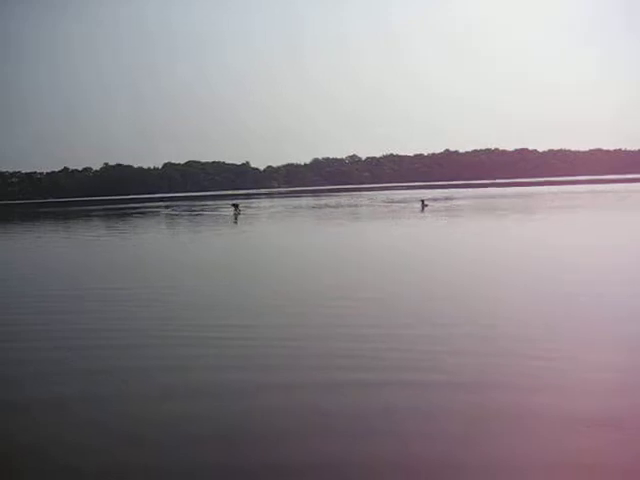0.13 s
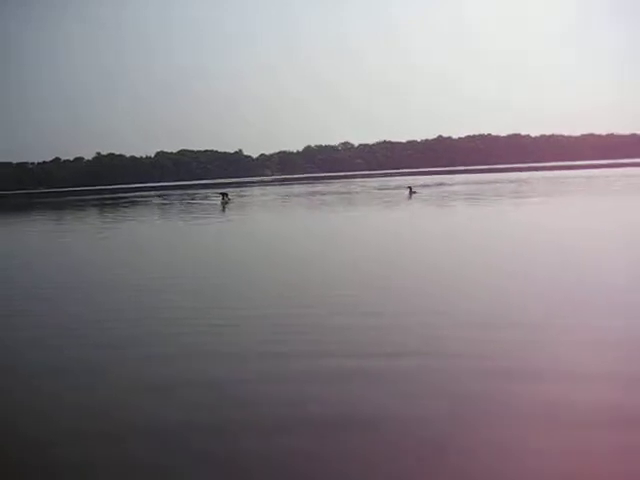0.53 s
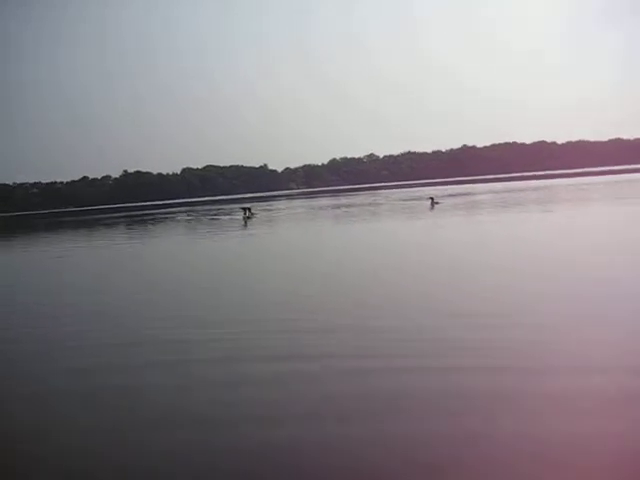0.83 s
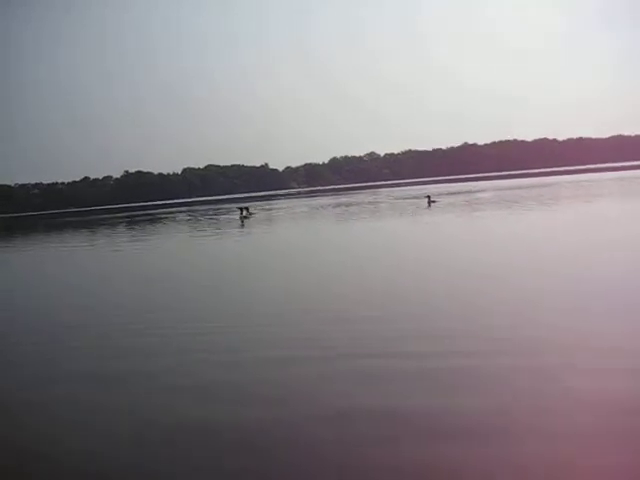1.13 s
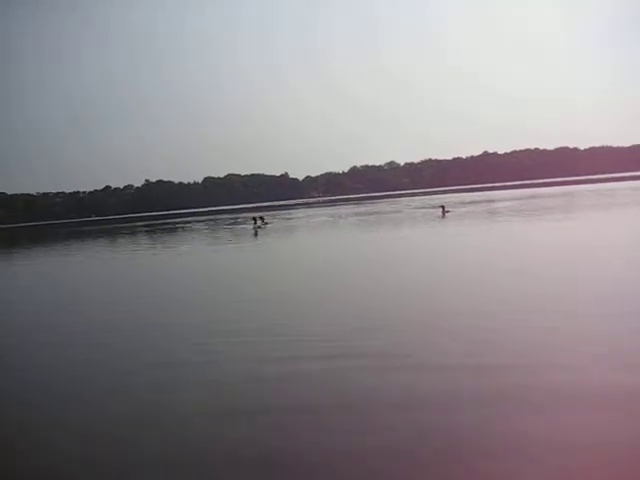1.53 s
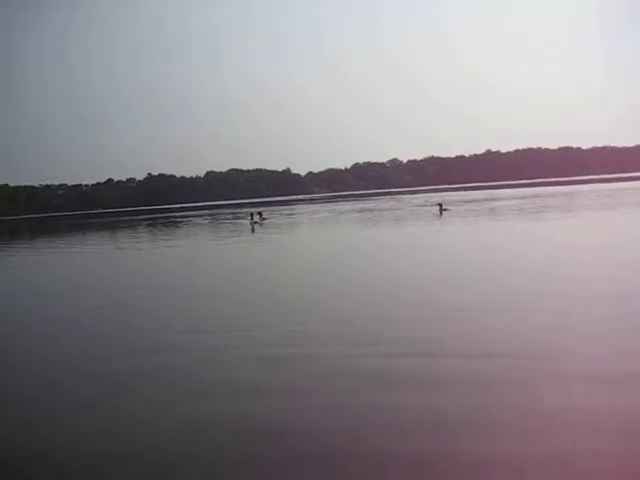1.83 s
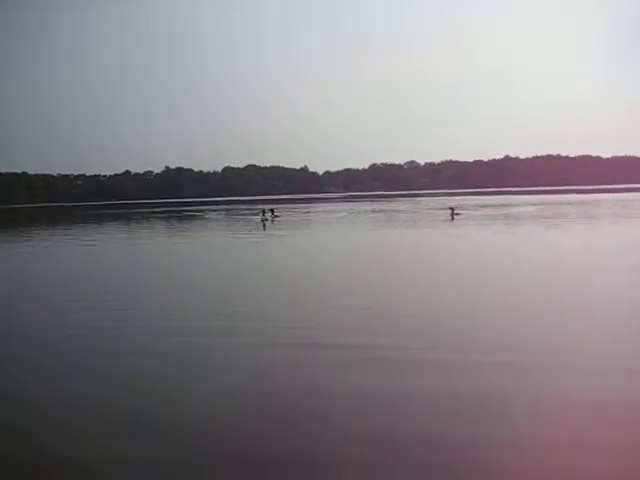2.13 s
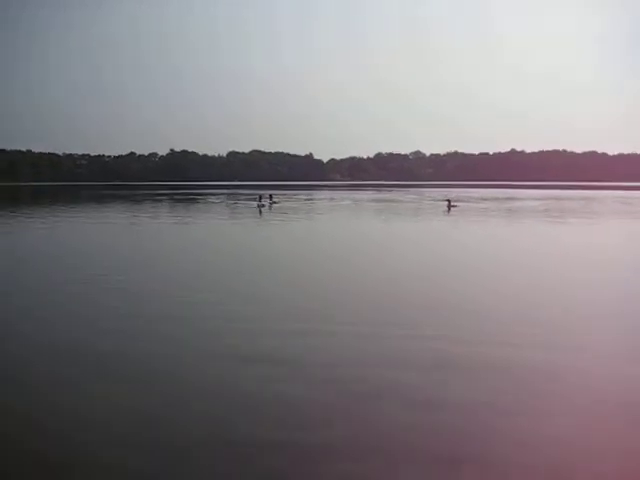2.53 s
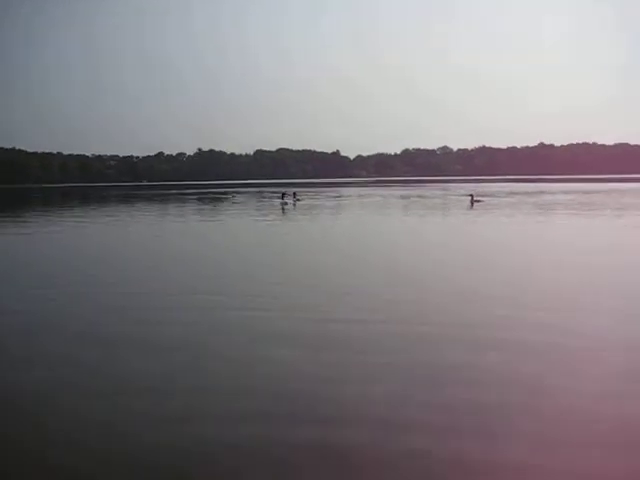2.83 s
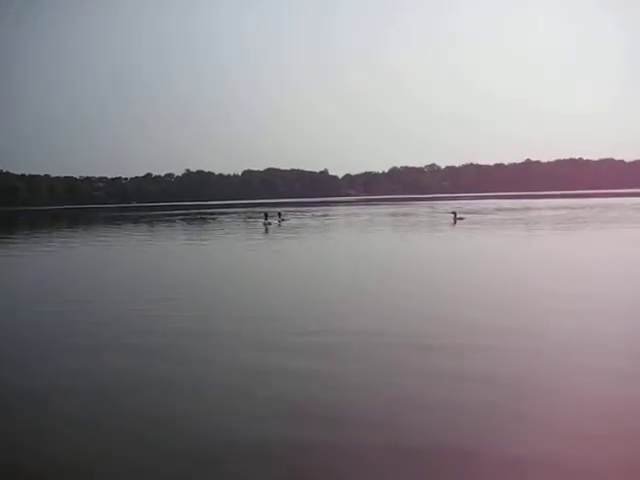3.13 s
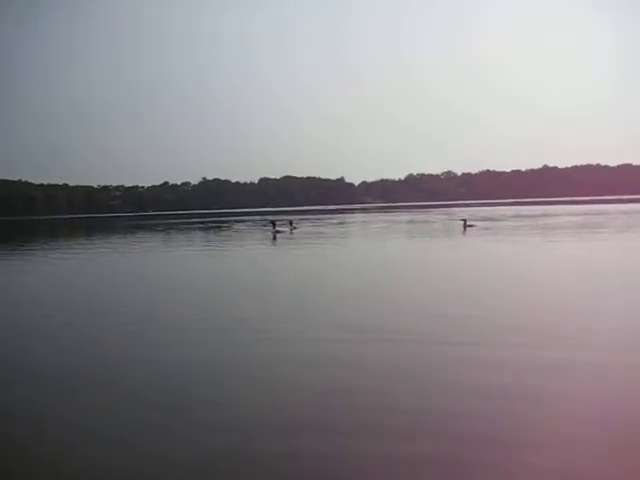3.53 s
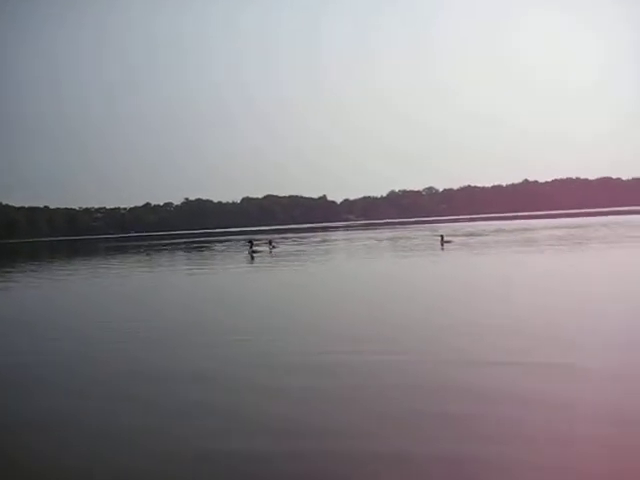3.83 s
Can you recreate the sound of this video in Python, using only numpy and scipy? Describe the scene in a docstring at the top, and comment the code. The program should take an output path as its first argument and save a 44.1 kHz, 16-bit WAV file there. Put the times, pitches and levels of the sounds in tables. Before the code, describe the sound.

Quavering loon calls ring across open water, flipping between low reedy notes and a clear high tremolo, with a very faint echo. The slightly dull microphone picks up gusty wind rumble, constant hiss and some light knocks.

```python
"""Loons on a calm lake.

Each call starts in a low reedy voice, breaks upward into a near-pure tremolo of ten swings a second
and drops back; the far shore returns a faint echo. Wind buffets the microphone over a steady hiss
and a few small knocks. A small camera limits the peaks and samples at a low rate."""
import sys
import numpy as np
from scipy import signal
from scipy.io import wavfile

SR = 44100
rng = np.random.default_rng(int(sys.argv[2]) if len(sys.argv) > 2 else 0)


def inscribe(sig):
    """Save sig as 16-bit PCM at rate SR to the path in sys.argv[1].

    A 1-D sig is mono; a 2-D sig holds one channel per row.
    Samples are clipped to [-1, 1] before scaling.
    """
    pcm = np.round(np.clip(np.atleast_2d(sig).T, -1, 1) * 32767)
    wavfile.write(sys.argv[1], SR, pcm.astype(np.int16))


N = 176400
TIME = np.arange(N) / SR

# Hiss spectrum: freq_hz, relative_density_db
HISS_SPECTRUM = [(100, -2.5), (500, -4), (1100, 4.5), (2000, -1), (3500, 0.5), (5000, -1), (7000, -12.5),
                 (12000, -51.5)]
# Wind rumble spectrum: freq_hz, relative_density_db
WIND_SPECTRUM = [(12, 0), (35, 2), (65, 1.5), (120, -1.5), (200, -19), (300, -21), (450, -38.5),
                 (700, -46.5), (1200, -60.5)]
# Wind rumble envelope: time_s, level_db
WIND_ENVELOPE = [(0, -24.5), (.4, -31), (.65, -30.5), (.77, -37), (.87, -29), (1.05, -29.5), (1.3, -25),
                 (1.5, -27), (1.75, -30), (2.0, -28), (2.23, -36), (2.33, -28.5), (2.5, -40.5), (2.75, -26),
                 (3.03, -34), (3.3, -35.5), (3.6, -34.5), (4.0, -35)]
# Slaps of air on the microphone: start_s, level_db, nominal_hz
BUFFETS = [(.390, -22.5, 134), (.442, -17, 181), (.538, -25, 243), (0.549, -21, 89.5), (.596, -14.5, 119),
           (.678, -26, 168), (0.819, -26, 180), (.843, -38.5, 91), (0.955, -24, 129), (1.115, -25, 130),
           (1.155, -26, 180), (1.195, -23, 159), (1.235, -19, 91.3), (1.341, -15, 145), (1.371, -15.5, 140),
           (1.571, -17.5, 204), (1.888, -18.5, 149.2), (1.969, -14.5, 121), (2.02, -20, 104),
           (2.114, -21, 218), (2.142, -20.5, 133), (2.306, -13, 67.8), (2.433, -22.5, 64.8),
           (2.649, -24.5, 148), (2.742, -22.5, 200), (2.871, -21, 130), (2.933, -27, 120), (2.97, -20, 80),
           (3.097, -19, 101), (3.636, -26.5, 136), (3.795, -25, 168), (3.934, -20, 65)]
# Knocks near the microphone: start_s, level_db, ring_hz, relative_snap_db
KNOCKS = [(0.275, -19, 1160, -18.5), (.443, -27.5, 950, -38), (0.705, -38, 1260, -22),
          (.944, -31.5, 990, 2.5), (1.13, -29.5, 1410, -6.5), (1.179, -30.5, 1200, -11),
          (1.215, -18, 1385, -21), (1.572, -35, 700, -10), (2.853, -25.5, 950, -26),
          (3.3455, -6.5, 1080, -7), (3.607, -20.5, 1300, -41.5), (3.757, -22.5, 1300, -11.5),
          (3.812, -38.5, 1300, 10.5)]
# Modes of a knock: ratio_to_ring, level_db, t60_s
KNOCK_MODES = [(.7, -9, 0.012), (1, -6, 0.022), (1.22, -7.5, 0.011), (1.9, -14.5, .012)]
# Low voice, one list per note: time_s, pitch_hz, level_db, overtone_boost_db
LOW_NOTES = [
    [(.360, 683, -39, 0), (.376, 648, -43, 2), (.392, 615, -65.5, -2)],
    [(1.322, 460, -57, 13), (1.360, 574, -45, 0.5), (1.372, 695, -35, -4), (1.398, 642, -38, -3.5),
     (1.418, 699, -29.5, 0.5), (1.440, 827, -24, 4.5), (1.462, 883, -23, -2), (1.503, 773, -40.5, -18.5)],
    [(1.907, 690, -34.5, -7.5), (1.945, 647, -38, 2), (1.976, 645, -70.5, -3.5)],
    [(2.480, 584, -51, -15), (2.497, 672, -37.5, 0.5), (2.528, 743.5, -28.5, 1), (2.575, 677, -36.5, -24.5),
     (2.605, 780, -29, -0.5), (2.627, 957, -27.5, -11)],
    [(2.797, 665, -34, -10), (2.825, 752, -29, 1), (2.845, 777, -31.5, -7.5), (2.880, 642, -36.5, -16.5),
     (2.920, 596, -41, -3), (2.948, 601, -68, -10.5)],
    [(3.163, 434, -49, 14.5), (3.186, 616, -46, 9.5)],
    [(3.186, 748, -31, 6), (3.203, 770.5, -24, 7), (3.243, 728, -25.5, -8.5), (3.262, 853, -21.5, -9.5),
     (3.279, 986, -18, -9.5)],
    [(3.742, 676, -36.5, -9), (3.768, 580, -66.5, -5)],
]
# High voice crests and troughs, one list per tremolo: time_s, pitch_hz, level_db
TREMOLOS = [
    [(.066, 1055, -13.5), (.111, 1288, -16), (.157, 1015, -20), (.211, 1192, -13), (.262, 982, -25.5),
     (.325, 1010, -22), (.348, 980, -29.5), (.361, 940, -46)],
    [(.095, 1390, -40), (.120, 1425, -33), (.138, 1310, -33.5), (.158, 1080, -45)],
    [(1.503, 1023, -13), (1.515, 1107, -13.5), (1.546, 1220, -11.5), (1.593, 1016, -24.5),
     (1.645, 1233, -11), (1.696, 1002, -22), (1.747, 1216, -11.5), (1.799, 976, -23), (1.857, 1134, -13),
     (1.890, 999, -21), (1.906, 928, -34.5)],
    [(2.627, 1136, -14), (2.638, 1071, -16.5), (2.674, 867, -26.5), (2.726, 1149, -14), (2.765, 905, -22.5),
     (2.797, 861, -27.5)],
    [(3.279, 1198, -11.5), (3.297, 1197, -12), (3.339, 1016, -18), (3.391, 1228, -11.5),
     (3.438, 1002, -19.5), (3.488, 1222, -11), (3.539, 994, -19.5), (3.592, 1187, -12), (3.645, 966, -22.5),
     (3.703, 992, -18), (3.728, 968, -25.5), (3.742, 920, -39.5)],
]
# Brightness, one value per tremolo: overtone_boost_db
TREMOLO_BOOST_DB = [1.5, -5.5, 0, -4, 0]
# Low voice harmonics from the second up, at LOW_REF_DB: relative_db, growth_db_per_db
LOW_OVERTONES = [(0.5, 0.065), (-13, 0.28), (-14.5, 1.0), (-23, 0.4), (-29.5, 0), (-32, .3)]
# High voice harmonics from the second up, at HIGH_REF_DB: relative_db, growth_db_per_db
HIGH_OVERTONES = [(-22.5, 0.02), (-22.5, 2.5), (-34, 0.9), (-36.5, -0.5), (-37.5, 0.1)]

LOW_REF_DB, HIGH_REF_DB = -21.5, -12
BREAK_S, CRACK_S, CRACK_JITTER = .0085, .015, .034
FLUTTER_DB, SHIMMER_DB, RASP_DB = 3, .15, -45


def from_db(db):
    """Decibels to gain."""
    return 10 ** (np.asarray(db) / 20)


def unit_rms(x):
    """Scale to unit power."""
    return x / np.sqrt(np.mean(x ** 2) + 1e-20)


def filtered(x, hz, kind="low", order=2):
    """Butterworth filter."""
    return signal.sosfilt(signal.butter(order, hz, kind, fs=SR, output="sos"), x + 1e-18)


def drift(rate_hz, size=N):
    """Low-passed random motion, spread about 1."""
    return unit_rms(filtered(rng.standard_normal(size + SR), rate_hz)[SR // 2:])[-size:]


def glide(times_s, values, t, power=1):
    """Cubic through the points, flat at turning points; power above 1 broadens the crests."""
    if power != 1:
        return np.maximum(glide(times_s, values ** power, t), 1e-15) ** (1 / power)
    steps_s = np.diff(times_s)
    chord = np.diff(values) / steps_s
    same_sign = np.maximum(chord[1:] * chord[:-1], 0)
    slope = np.r_[chord[0], 2 * same_sign / (chord[1:] + chord[:-1] + 1e-15), chord[-1]]
    i = np.clip(np.searchsorted(times_s, t) - 1, 0, len(chord) - 1)
    u = np.clip((t - times_s[i]) / steps_s[i], 0, 1)
    bend = (slope[i] - chord[i]) * (1 - u) - (slope[i + 1] - chord[i]) * u
    return values[i] + steps_s[i] * u * (chord[i] + (1 - u) * bend)


def noise_bands(spectrum, count):
    """Log-spaced noise bands under a spectrum, total power 1."""
    hz, db = np.transpose(spectrum)
    edges_hz = np.geomspace(hz[0], hz[-1], count + 1)
    gains = from_db(np.interp(np.log(edges_hz[1:] * edges_hz[:-1]) / 2, np.log(hz), db))
    bands = np.array([gain * filtered(rng.standard_normal(N), [low, high], "band")
                      for gain, low, high in zip(gains, edges_hz, edges_hz[1:])])
    return bands / np.std(bands.sum(0))


def hiss(level_db=-53.5):
    """Steady broadband noise."""
    return from_db(level_db) * noise_bands(HISS_SPECTRUM, count=14).sum(0)


def wind(gain_db=1, eddy_hz=14, low_swing_db=1.5, high_swing_db=7.5):
    """Lumpy rumble: each eddy lifts the upper bands more than the lowest."""
    bands = noise_bands(WIND_SPECTRUM, count=10)
    eddies = np.clip(drift(eddy_hz), -2, 2)
    swing_db = np.linspace(low_swing_db, high_swing_db, len(bands))[:, None]
    rumble = unit_rms((bands * from_db(swing_db * eddies)).sum(0))
    return rumble * from_db(gain_db + np.interp(TIME, *np.transpose(WIND_ENVELOPE)))


def buffets(gain_db=1.5, rise_cycles=.41, cutoff_hz=550):
    """Slaps of air: soft pressure swings that start fast, slow and die in about two cycles."""
    out = np.zeros(N)
    for start_s, level_db, nominal_hz in BUFFETS:
        cycles = np.clip((TIME - start_s) * nominal_hz, 0, 10)
        age = cycles / rise_cycles
        swing = np.sin(2 * np.pi * (cycles / 2 + np.log1p(cycles)))
        out += from_db(level_db + gain_db) * age * np.exp(1 - age) * swing
    return filtered(out, cutoff_hz)


def knocks(snap_t60_s=.023):
    """Short woody rings, each with a bright noise snap."""
    out, t = np.zeros(N + SR), TIME[:SR // 20]
    for start_s, level_db, ring_hz, snap_db in KNOCKS:
        ring = sum((-1) ** k * from_db(db - 60 * t / t60_s) * np.sin(2 * np.pi * ring_hz * ratio * t)
                   for k, (ratio, db, t60_s) in enumerate(KNOCK_MODES))
        snap = rng.standard_normal(len(t)) * from_db(snap_db - 60 * t / snap_t60_s)
        start = int(start_s * SR)
        out[start:start + len(t)] += from_db(level_db) * (ring + snap)
    return out[:N]


def shore_echo(x, relative_db=-39, delay_s=.6, spread_s=.22, cutoff_hz=1500):
    """Late, faint echo from the far shore, smeared and dulled by trees."""
    age = np.maximum(TIME[:2 * SR] - delay_s, 0) / spread_s
    response = filtered(rng.standard_normal(2 * SR), cutoff_hz) * age * np.exp(-age)
    return from_db(relative_db) * np.std(x) * unit_rms(signal.fftconvolve(x, response)[:N])


def loon_voice(notes, overtones, ref_db, jitter):
    """Harmonic tone, brighter when loud; abrupt and briefly hoarse at each voice break."""
    out = np.zeros(N)
    for note in notes:
        times_s, hz, db, boosts_db = np.transpose(sorted(note))
        span = (TIME > times_s[0] - BREAK_S / 2) & (TIME < times_s[-1] + BREAK_S / 2)
        t = TIME[span]
        edge_s = np.minimum(t - times_s[0], times_s[-1] - t)
        crack = CRACK_JITTER * np.exp(-np.abs(edge_s) / CRACK_S) * drift(400, len(t))
        pitch_hz = glide(times_s, hz, t, power=3.2) * (1 + jitter * drift(110, len(t)) + crack)
        level = glide(times_s, from_db(db), t, power=1.7)
        over_ref_db = 20 * np.log10(level) - ref_db
        boost_db = glide(times_s, boosts_db, t)
        phase = 2 * np.pi * np.cumsum(pitch_hz) / SR
        tone = np.sin(phase)
        for harmonic, (relative_db, growth) in enumerate(overtones, start=2):
            gain_db = relative_db + boost_db + growth * over_ref_db + FLUTTER_DB * drift(22, len(t))
            tone += from_db(gain_db) * np.sin(harmonic * phase)
        gate = np.clip(edge_s / BREAK_S + .5, 0, 1)
        shimmer = from_db(SHIMMER_DB * drift(57, len(t)))
        rasp = from_db(RASP_DB) * drift(700, len(t))
        out[span] += tone * level * gate * (shimmer + rasp)
    return out


def loons():
    """Calls in two registers: near-pure high tremolos and reedy low notes."""
    tremolos = [[(*point, boost_db) for point in tremolo]
                for tremolo, boost_db in zip(TREMOLOS, TREMOLO_BOOST_DB)]
    high = loon_voice(tremolos, HIGH_OVERTONES, HIGH_REF_DB, jitter=.001)
    low = loon_voice(LOW_NOTES, LOW_OVERTONES, LOW_REF_DB, jitter=.004)
    return high + low


def limiter(x, threshold_db=-11, attack_s=.004, release_db_per_s=120):
    """Fast limiter: flattens crests, lets the briefest clicks through."""
    over_db = np.maximum(20 * np.log10(np.abs(x) + 1e-9) - threshold_db, 0)
    release_db = release_db_per_s * TIME
    held_db = np.maximum.accumulate(over_db + release_db) - release_db
    pole = np.exp(-1 / (attack_s * SR))
    return x * from_db(-signal.lfilter([1 - pole], [1, -pole], held_db))


def scene():
    """Loons, echo, wind, knocks and hiss in mono."""
    calls = loons()
    return (calls + shore_echo(calls) + wind() + buffets() + knocks() + hiss())[None]


def record(dry, start_s=.072, decimation=4):
    """The camera starts, limits and samples coarsely; top overtones fold back around 5.5 kHz."""
    band_limited = filtered(limiter(dry), hz=5910, order=8)
    sampled = band_limited * decimation * (np.arange(N) % decimation == 0)
    smoothed = filtered(sampled, hz=5400, order=24)
    return filtered(smoothed * (TIME >= start_s), hz=17092, order=12)


dry = scene()
out = record(dry)
inscribe(out)
```